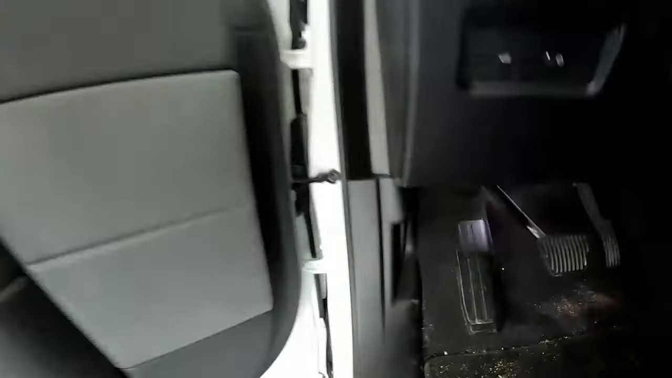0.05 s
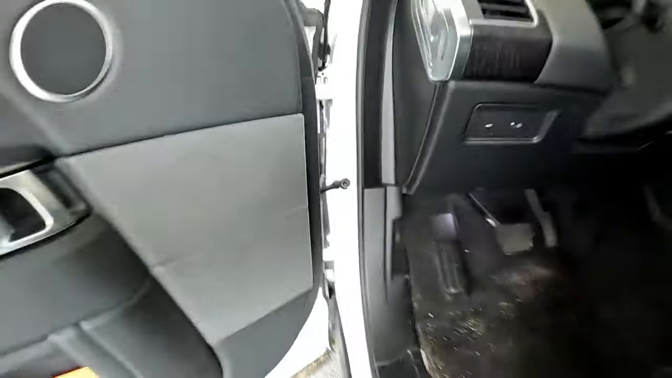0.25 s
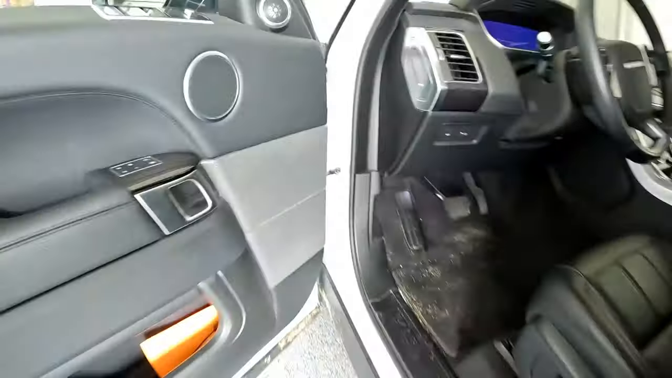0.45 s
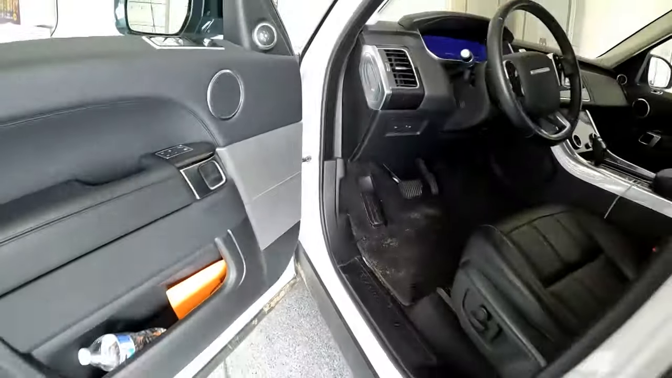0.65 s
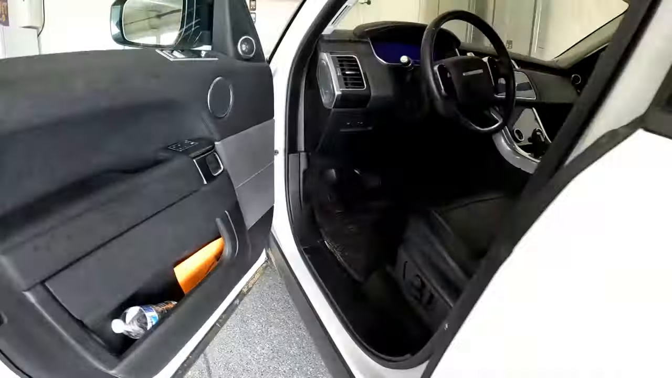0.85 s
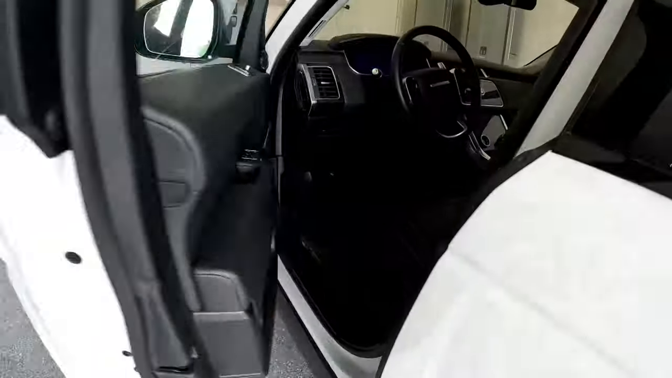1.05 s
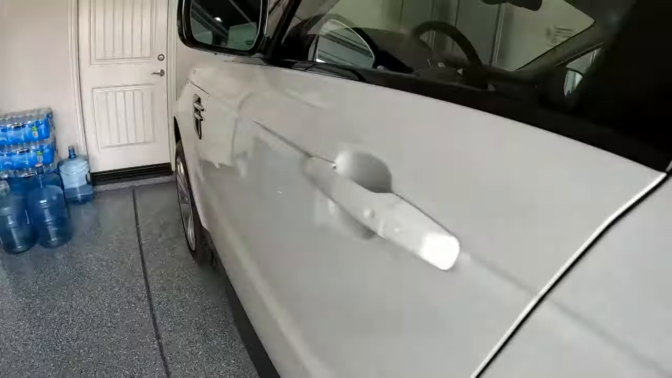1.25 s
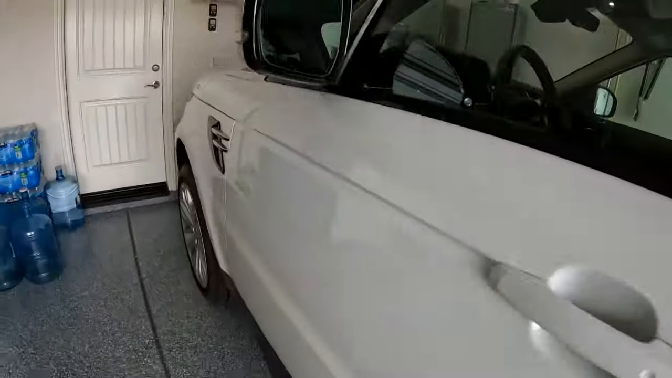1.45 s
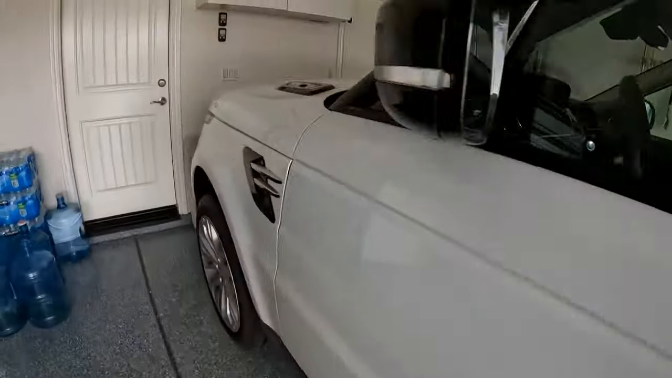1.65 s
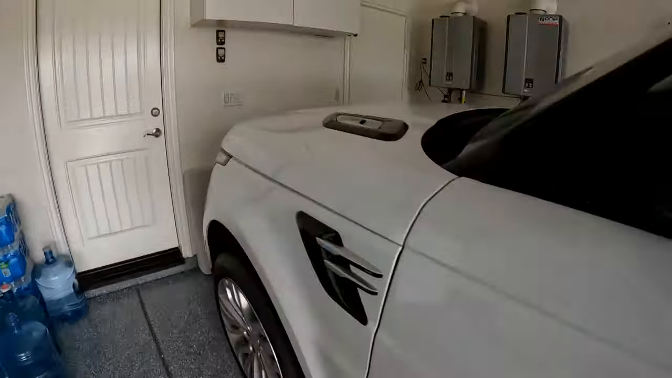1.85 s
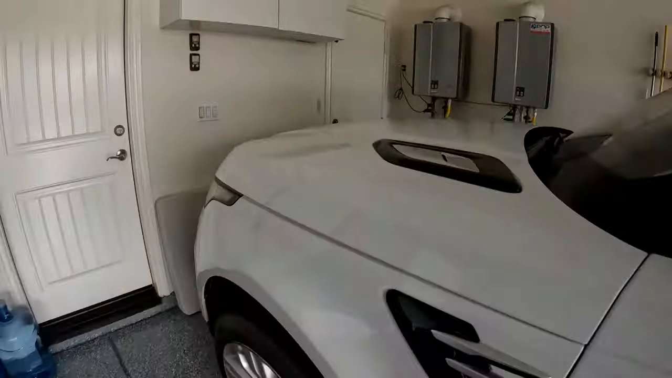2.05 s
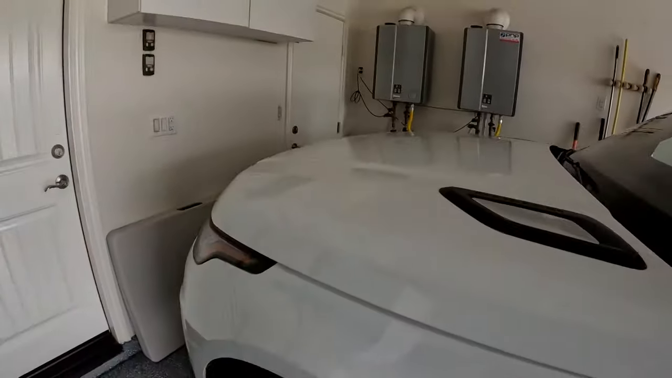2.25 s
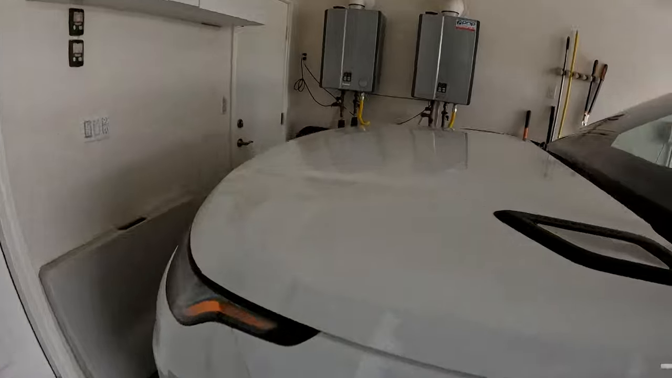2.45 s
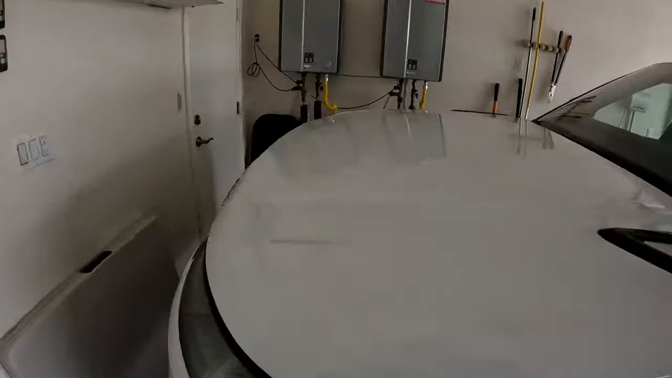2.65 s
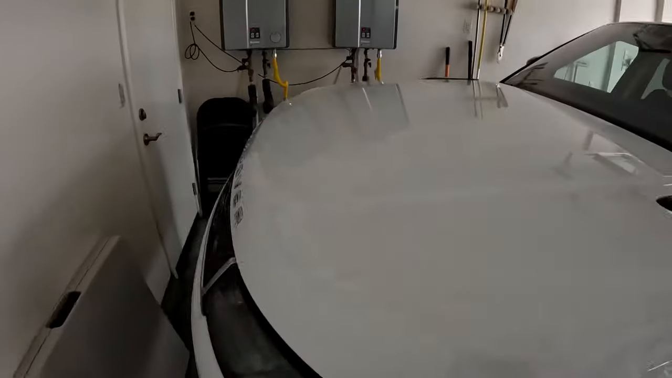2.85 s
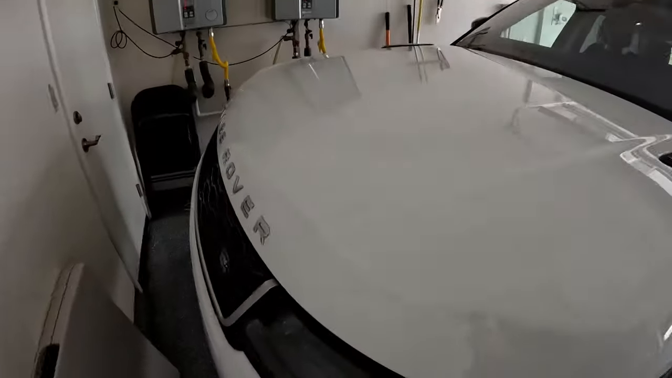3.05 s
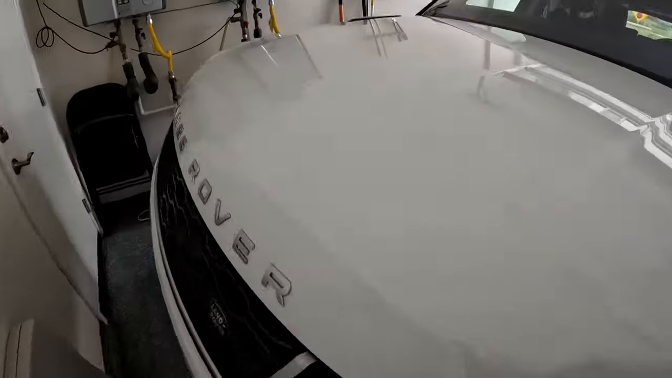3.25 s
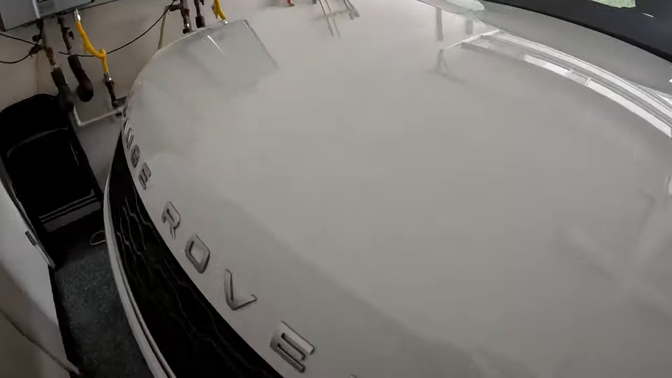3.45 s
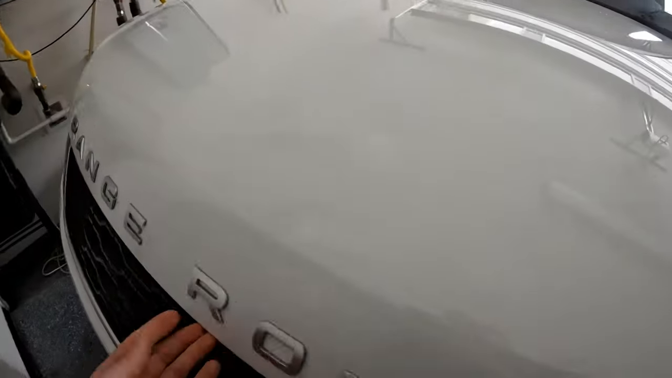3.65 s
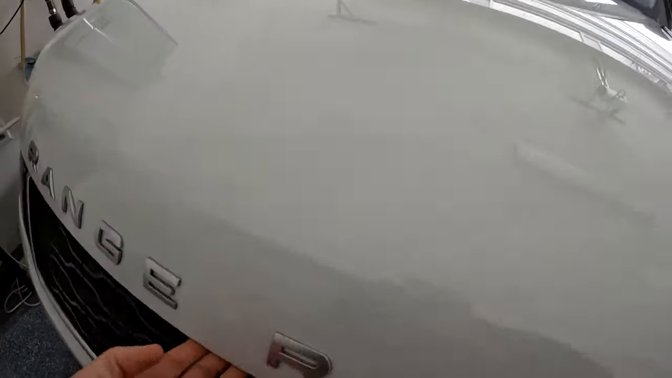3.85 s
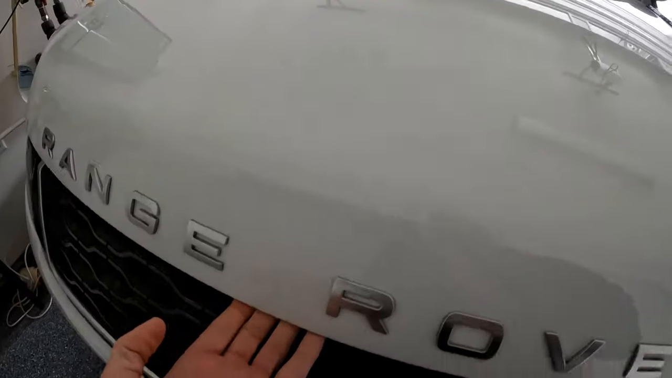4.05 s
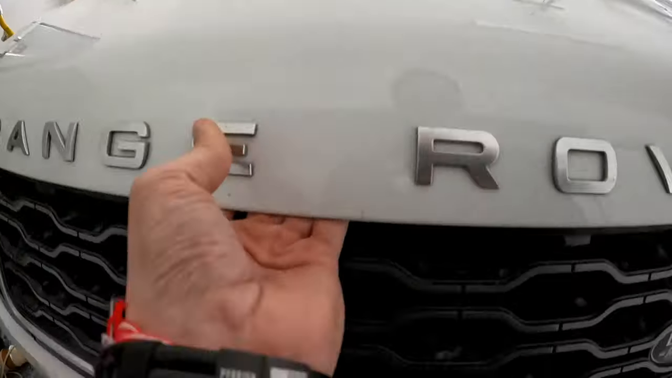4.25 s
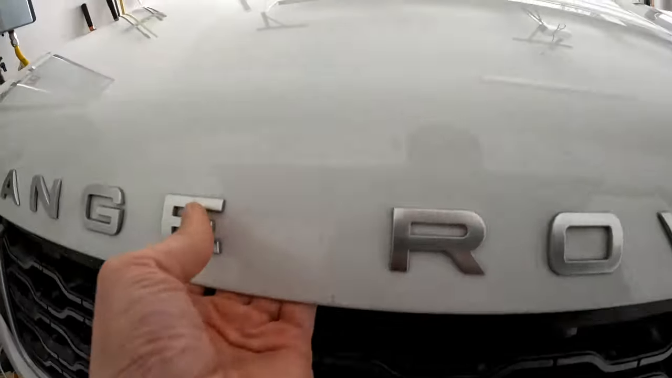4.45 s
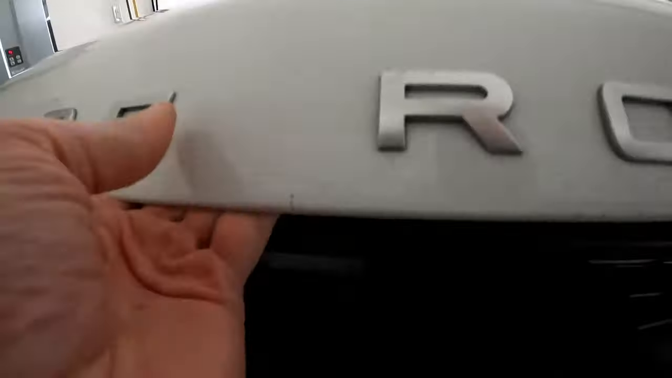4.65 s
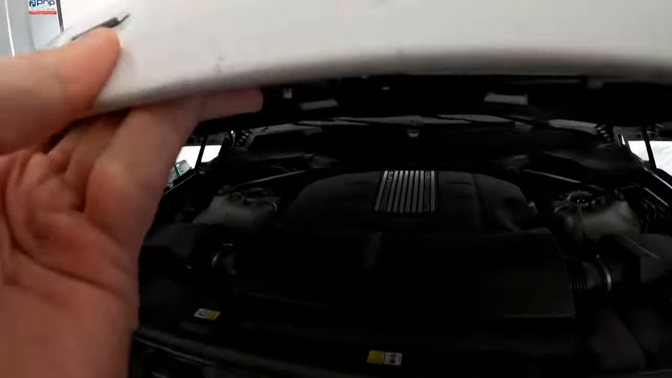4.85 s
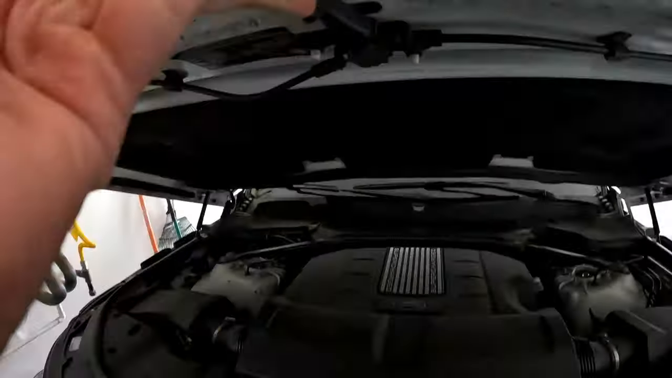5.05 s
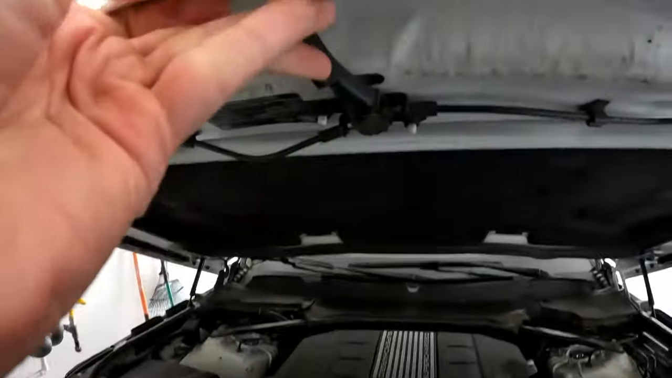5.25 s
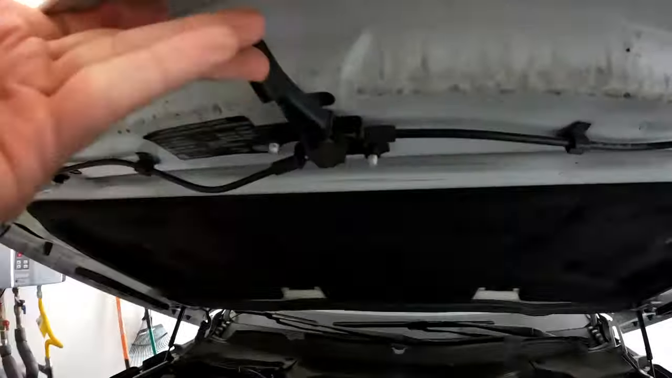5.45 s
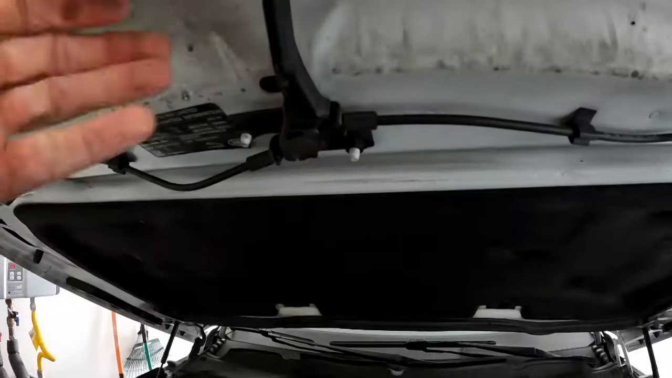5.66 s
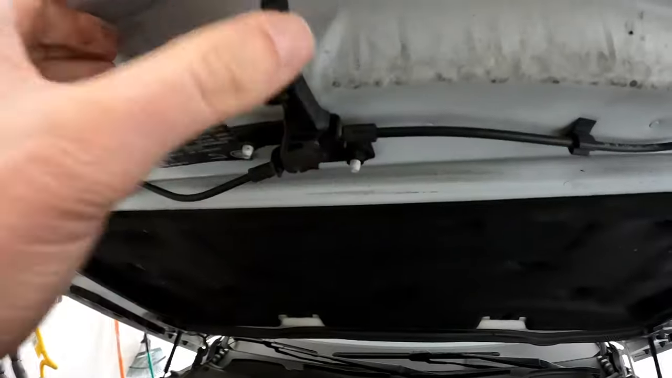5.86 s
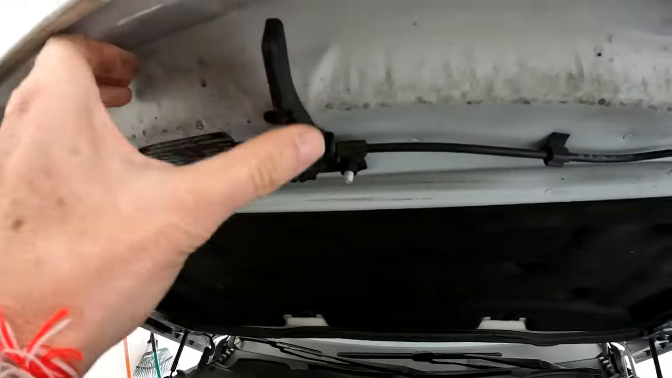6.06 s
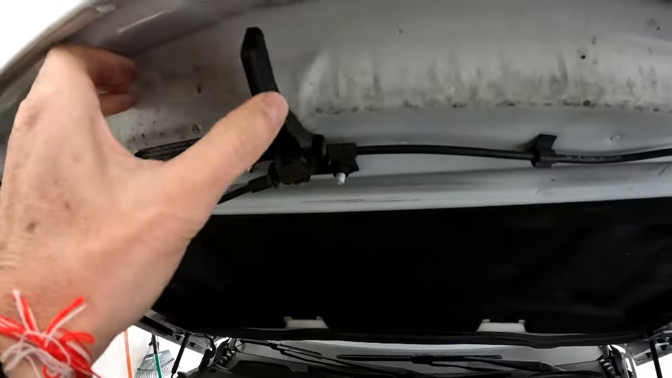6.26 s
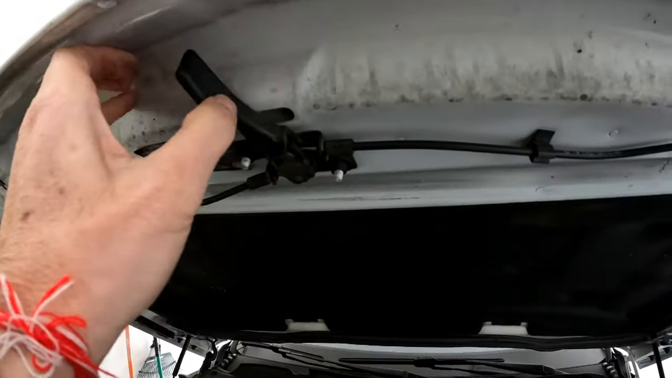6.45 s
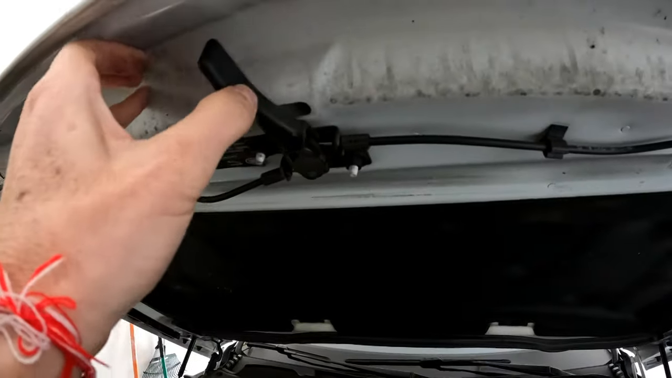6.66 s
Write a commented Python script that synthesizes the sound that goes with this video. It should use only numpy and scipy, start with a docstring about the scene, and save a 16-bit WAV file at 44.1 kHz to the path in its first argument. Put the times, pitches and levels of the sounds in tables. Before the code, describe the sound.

In a small garage with a short diffuse tail, a close hand-held stereo microphone picks up low handling rumble and faint clothes rustle throughout. From 0 to 1 s come soft bass bumps, tiny clicks and scuffs, with the rumble swelling near 0.5 s. At 1.3 s a car door slams: quick seal and latch contacts, a deep boom and a dying clattering wash. Around 2.1 s there are soft steps and a bright sleeve brush on the left. From 2.4 to 4.2 s trouser legs brush faintly about every 0.4 s; a sole creaks at 3.4. Fingers knock on hollow sheet metal from 3.7 to 4.4 s. At 4.5 s the metal catch snaps and rebounds brightly, followed by rubs, ticks and low bumps as the bonnet lifts. At 5.6 s its struts knock solidly on their stop. Faint fingertip slides and hand rubs, with a click near 6.55 s, close it.

```python
"""In a garage, two close microphone ports on a hand-held camera hear its holder step back from a car and slam the door.
A sleeve brushes near the left port, then trouser legs brush at each stride of the walk round to the bonnet; a sole creaks.
Fingers knock under the edge, the safety catch snaps free, the bonnet rises until its struts knock on their stop, and a hand rubs on.
Knocks are decaying modes plus noise cracks; cloth and hands are grainy noise strokes; handling rumble, shuffle and rustle
are fluttering noise that lasts throughout. The garage answers with a short diffuse tail."""
import sys
import numpy as np
from scipy import signal
from scipy.fft import rfft, irfft, next_fast_len
from scipy.io import wavfile
from scipy.ndimage import map_coordinates

SR = 44100
rng = np.random.default_rng(int(sys.argv[2]) if len(sys.argv) > 2 else 0)


def unload_audio(sound):
    """Save the sound as a 16-bit wav file, at the path given as the first command line argument."""
    columns = np.transpose(np.atleast_2d(sound))
    # keep every value between -1 and 1, then stretch to whole-number steps
    steps = np.round(np.clip(columns, -1, 1) * 32767)
    wavfile.write(sys.argv[1], SR, steps.astype(np.int16))


N = 295955

# Columns shared by the tables below:
#   hits: t/s, ring level/dB, clatter level/dB, brightness/(dB per octave)
#   modes: f/Hz, level relative to the ring/dB, T60/s
#   strokes: t/s, length/s, level/dB, brightness/(dB per octave)
#   spectra: f/Hz, relative density level/dB (per Hz)


def amp(db):
    """Decibels to gain."""
    return 10 ** (np.asarray(db) / 20)


def unit(x):
    """Scaled to rms 1."""
    return x / np.sqrt(np.mean(x ** 2) + 1e-20)


def along(points, hz):
    """Interpolates (f/Hz, value) points on a log frequency axis."""
    f, value = np.transpose(points)
    return np.interp(np.log(hz + 1), np.log(f + 1), value)


def wobble(rate):
    """A smooth random curve through rate knots a second."""
    knots = rng.standard_normal(int(N * rate / SR) + 4)
    return map_coordinates(knots, [np.arange(N) * rate / SR])


def filtered(x, response):
    """x times a response of frequency, padded against wrap-round."""
    n = x.shape[-1]
    size = next_fast_len(n + 8192)
    hz = np.fft.rfftfreq(size, 1 / SR)
    return irfft(rfft(x, size) * response(hz), size)[..., :n]


def coloured(x, spectrum, tilt_db, size=2048):
    """x through a causal minimum-phase filter of unit energy: the spectrum, tilted by about tilt_db per octave."""
    hz = np.fft.rfftfreq(size, 1 / SR)
    octaves = np.log2(hz / 1000 + 1 / 10)  # the tilt levels out in the bass
    gain = amp(along(spectrum, hz) + tilt_db * octaves)
    # folding the cepstrum forward in time makes the filter causal
    cepstrum = irfft(np.log(np.maximum(gain / gain.max(), 1e-5)))
    cepstrum[1:size // 2] *= 2
    cepstrum[size // 2 + 1:] = 0
    pulse = irfft(np.exp(rfft(cepstrum)))
    return signal.fftconvolve(x, pulse / np.linalg.norm(pulse))[:len(x)]


def add(track, s, sound):
    """Mixes a sound into the track at s seconds."""
    part = track[max(round(s * SR), 0):][:len(sound)]
    part += sound[:len(part)]


def struck(hits, modes, colour, crack_t60, crack_rise, attack, waver):
    """Each contact rings the modes anew and adds a short crack; loose joints make the modes waver. Times in s."""
    out, t = np.zeros(N), np.arange(SR // 2) / SR
    hz, level, t60 = np.transpose(modes)[:, :, None]
    rings = amp(level - 60 * t / t60) * (1 - np.exp(-t / attack))
    fade = amp(-60 * t / crack_t60) * (1 - np.exp(-t / crack_rise))
    slow = signal.butter(3, 150, fs=SR, output="sos")
    for s, ring_db, clatter_db, tilt_db in hits:
        # the phase wanders slowly, more for the higher modes
        jitter = signal.sosfilt(slow, rng.standard_normal(rings.shape))
        drift = waver * np.cumsum(jitter, axis=1) * np.sqrt(np.sqrt(hz) / SR)
        ring = np.sum(rings * np.sin(2 * np.pi * hz * t + drift), axis=0)
        crack = fade / fade.max() * rng.standard_normal(len(t))
        clatter = coloured(crack, colour, tilt_db)
        add(out, s, amp(ring_db) * ring + amp(clatter_db) * clatter)
    return out


def friction(strokes, colour, grain_db, grain_rate, skew):
    """Strokes that swell and fade, made of many tiny slips of uneven size."""
    out = np.zeros(N)
    slips = unit(rng.standard_normal(N) * amp(grain_db * wobble(grain_rate)))
    for s, length, db, tilt_db in strokes:
        t = np.arange(int(length * SR) + SR // 50) / SR
        swell = np.abs(np.sin(np.pi * np.minimum(t / length, 1) ** skew))  # skew below 1 peaks early
        stroke = swell * np.roll(slips, -int(s * SR))[:len(t)]
        add(out, s, amp(db) * coloured(stroke, colour, tilt_db))
    return out


# diffuse sound at the two ports: f/Hz, side level re mid/dB
DIFFUSE_WIDTH = [(60, -15), (180, -13), (400, -6.5), (1200, -8), (2500, -6.5), (8000, -7.5), (14000, 5.5)]


def diffuse(pair):
    """Two unrelated signals as close microphone ports hear them: most alike in the bass, apart in the high treble."""
    side = filtered(pair[1], lambda hz: amp(along(DIFFUSE_WIDTH, hz)))
    return np.array([pair[0] + side, pair[0] - side])


def shaded(pair, pan_db):
    """The camera body shades one port in the treble; pan_db is the left-minus-right limit at high frequency."""
    sides = np.array([[1], [-1]])
    return filtered(pair, lambda hz: amp(sides * pan_db / 2 * hz / (hz + 3000)))


def rush(spectrum, flutter_db, rate):
    """Diffuse noise of rms 1 whose level flutters."""
    noise = filtered(rng.standard_normal((2, N)), lambda hz: amp(along(spectrum, hz)))
    return unit(diffuse(noise) * amp(flutter_db * wobble(rate)))


# the door meets seal, first latch stage and striker: hits
DOOR_CONTACTS = [(1.295, -39, -46.5, -3.5), (1.3065, -25.5, -17.5, -2), (1.3115, -24.5, -16, -5),
                 (1.3175, -16.5, -14.5, 3), (1.3255, -24, -21, -3.5), (1.341, -22, -31, -0.5),
                 (1.374, -36, -38, -4)]
# door skin and cabin air: modes
DOOR_RESONANCES = [(36.2, 5.5, 0.41), (45.9, 5, 0.42), (84, -5.5, 0.08), (117, 3.5, .2), (169.8, -2, 0.17),
                   (227, -8, 0.15), (354.8, -7, 0.17), (480.6, -11, .12), (1020, -15, 0.044)]
# crack and wash of the door: spectrum
DOOR_SPECTRUM = [(120, -13), (280, -3), (500, -2.5), (850, -9), (1070, 0.5), (1300, -5.5), (2000, -6.5),
                 (2280, -12.5), (2700, -8), (3100, -12), (4000, -14), (5200, -17.5), (7400, -25),
                 (11000, -44), (15500, -63)]


def door_slam():
    """Seal, latch and striker contacts ring the door skin and the cabin air."""
    return struck(DOOR_CONTACTS, DOOR_RESONANCES, DOOR_SPECTRUM,
                  crack_t60=0.027, crack_rise=0.002, attack=0.00027, waver=2.5)


WASH_S, WASH_RISE_S, WASH_T60_S = 1.312, 0.0066, 0.22
WASH_DB, WASH_TILT_DB = -21, -0.5  # decay line's level at the start; brightness in dB per octave


def door_wash():
    """Trim rattles and echoes merge into a smooth, dying crash after the slam."""
    out, t = np.zeros((2, N)), np.arange(SR // 2) / SR
    fade = amp(WASH_DB - 60 * t / WASH_T60_S) * (1 - np.exp(-t / WASH_RISE_S))
    for track in out:
        crash = fade * rng.standard_normal(len(t))
        add(track, WASH_S, coloured(crash, DOOR_SPECTRUM, WASH_TILT_DB))
    return diffuse(out)


# the struts reach the end of their travel: hits, modes, spectrum
STOP_CONTACTS = [(5.6115, -49, -44, -7), (5.6205, -48, -33.5, 0.5), (5.624, -28, -14, -3.5),
                 (5.6315, -21.5, -16, -1.5), (5.634, -10, -25, 0)]
STOP_RESONANCES = [(122.7, -4, 0.13), (170, -2, 0.11), (233, 4, 0.068), (262, -10, 0.19), (346, -15, 0.15),
                   (532, -12.5, 0.1), (838, -17, 0.072), (980, -15, 0.08)]
STOP_SPECTRUM = [(180, -14.5), (300, -17), (450, -19.5), (1000, 1), (1700, -12.5), (1950, -17.5),
                 (2250, -15), (3900, -20.5), (4750, -16.5), (6500, -20.5), (7800, -19), (13000, -44),
                 (15500, -50)]


def strut_stop():
    """The raised bonnet rings as its struts knock against their stop."""
    return struck(STOP_CONTACTS, STOP_RESONANCES, STOP_SPECTRUM,
                  crack_t60=0.028, crack_rise=0.00086, attack=0.002, waver=2.5)


# the safety catch lets go and rebounds: hits, modes, spectrum
CATCH_CONTACTS = [(4.4872, -33, -21.5, 5.5), (4.4915, -29, -23, 2), (4.5065, -27, -16, 5),
                  (4.511, -29, -23, 3), (4.532, -44, -38.5, 1)]
CATCH_RESONANCES = [(114, 7, 0.14), (266.5, -3.5, 0.15), (358, -15, 0.12), (504, -5.5, 0.084),
                    (1033, 1, 0.1), (1390, 0.5, 0.082), (2155, 1, 0.042), (4370, -8.5, 0.071)]
CATCH_SPECTRUM = [(120, -7), (260, 20), (640, 4.5), (1100, 7.5), (1500, 4.5), (2170, -4.5), (3000, -15),
                  (3700, -10.5), (4260, -12.5), (4900, -25.5), (6300, -25.5), (7300, -40), (12900, -49.5),
                  (15500, -58.5)]


def safety_catch():
    """The catch snaps free and rebounds in a bright burst of metal contacts."""
    return struck(CATCH_CONTACTS, CATCH_RESONANCES, CATCH_SPECTRUM,
                  crack_t60=0.022, crack_rise=0.002, attack=0.00062, waver=1.95)


REBOUND_S, REBOUND_DB = 0.027, -7.5  # delay and level change of the rebound


def rattled(hits):
    """The loose bonnet rattles once more, weaker, after each knock."""
    rebounds = [(s + REBOUND_S, ring_db + REBOUND_DB, clatter_db + REBOUND_DB, tilt_db)
                for s, ring_db, clatter_db, tilt_db in hits]
    return list(hits) + rebounds


# fingers and hand on the bonnet: hits, modes, spectrum
BONNET_KNOCKS = [(3.721, -27, -39, 5.5), (3.936, -41, -34, 0), (4.092, -34, -28.5, 2.5),
                 (4.098, -24.5, -33, -6.5), (4.11, -29, -26.5, -3), (4.32, -31.5, -52.5, 3),
                 (4.363, -26.5, -26.5, -7.5), (4.545, -30.5, -31.5, 1), (4.826, -35, -51, 10.5),
                 (4.998, -34, -50.5, 6.5), (5.084, -55, -42, 4)]
BONNET_RESONANCES = [(58.4, -5, 0.212), (131.4, -3, 0.2), (216.2, -11, 0.32), (269.5, 0.5, 0.083),
                     (303, -16, 0.29), (390, -6.5, 0.077), (518, -13.5, 0.053), (1054, -21.5, 0.1),
                     (1143, -16, 0.06), (1378, -19.5, 0.057)]
BONNET_SPECTRUM = [(120, -5.5), (200, -29), (262, -4), (683, -9), (1150, -12.5), (1360, -17), (1750, -21.5),
                   (2330, -25.5), (7690, -47), (15000, -73)]


def bonnet_knocks():
    """Fingers and hand knock on the loose sheet, which rings and rebounds."""
    return struck(rattled(BONNET_KNOCKS), BONNET_RESONANCES, BONNET_SPECTRUM,
                  crack_t60=0.035, crack_rise=0.0015, attack=0.0012, waver=2.57)


# strokes of the hand and of the sliding struts: strokes, spectrum
RUB_STROKES = [(4.62, 0.17, -40.5, -4), (4.8, 0.078, -50.5, 1), (5.575, 0.062, -45, -1),
               (6.27, 0.044, -55.5, -0.5), (6.335, 0.14, -45, 2), (6.535, 0.078, -40.5, 0.5),
               (6.65, 0.074, -46, 2)]
RUB_SPECTRUM = [(120, -8), (200, 1), (352, -2), (479, -9.5), (798, -2), (1170, -3.5), (1430, -10),
                (3610, -25.5), (5300, -20), (5910, -23.5), (10200, -34), (15500, -54.5)]


def rubs():
    """Hand and sliding struts rub in fine, even slips."""
    return friction(RUB_STROKES, RUB_SPECTRUM, grain_db=1.0, grain_rate=490, skew=1.05)


# fingertips on paint and plastic: strokes, spectrum
SLIDE_STROKES = [(4.58, 0.17, -48.5, -1.5), (5.247, 0.049, -49, -1), (5.508, 0.047, -53.5, -1),
                 (5.832, 0.049, -58.5, 7), (5.968, 0.072, -55, 1), (6.118, 0.049, -60.5, -4)]
SLIDE_SPECTRUM = [(250, -2.5), (700, 0), (1300, 2), (2100, -8), (2900, -11.5), (3800, -28), (8000, -32),
                  (15500, -49.5)]


def fingertip_slides():
    """Fingertips slip softly over paint and plastic."""
    return friction(SLIDE_STROKES, SLIDE_SPECTRUM, grain_db=2.5, grain_rate=300, skew=0.58)


# the clearest clicks of grit, trim and linkage: t/s, level before doubling/dB, brightness/(dB per octave)
CLEAR_TICKS = [(0.125, -39, 4), (0.13, -44.5, 6), (.432, -50, 5.5), (1.842, -48, -9), (3.672, -35.5, -3),
               (4.673, -43, -8), (4.85, -45.5, -3), (4.882, -43, -6), (4.99, -48, -1), (5.02, -37, -8.5),
               (5.32, -52, -7), (5.512, -52, 9), (5.756, -51.5, 0.5), (6.548, -44, 8)]
# clicks: spectrum
TICK_SPECTRUM = [(300, -30.5), (1200, 12.5), (2800, 7), (6000, 10), (9000, -2.5), (15500, -31.5)]
# the camera is drawn back, then the bonnet is lifted: from t/s, to t/s
FAINT_TICK_SPELLS = [(0.381, .85), (4.65, 5.35)]
FAINT_TICK_COUNT = 4  # in each spell
FAINT_TICK_DB, FAINT_TICK_SPREAD_DB = -59, 4  # mean level before doubling, and standard deviation


def ticks(t60, rise):
    """Tiny hard contacts that hardly ring: the clear ones, and faint ones at random. Times in s."""
    out, t = np.zeros(N), np.arange(SR // 20) / SR
    contacts = list(CLEAR_TICKS)
    for start, end in FAINT_TICK_SPELLS:
        for _ in range(FAINT_TICK_COUNT):
            s = start + (end - start) * rng.random()
            db = FAINT_TICK_DB + FAINT_TICK_SPREAD_DB * rng.standard_normal()
            contacts.append((s, db, 0))
    for s, db, tilt_db in contacts:
        fade = 2 * amp(db - 60 * t / t60) * (1 - np.exp(-t / rise))
        snap = fade * rng.standard_normal(len(t))
        add(out, s, coloured(snap, TICK_SPECTRUM, tilt_db))
    return out


# footfalls and bumps of the carried camera: hits (thump as ring, slap as clatter), modes
STEP_CONTACTS = [(.045, -32, -56, -7), (.078, -30.5, -55, 6), (.354, -32.5, -52, -4), (.386, -28, -48, 0),
                 (.585, -32, -52, -4.5), (.978, -33, -37.5, -2), (2.066, -30, -58.5, 5.5),
                 (2.108, -30.5, -43, -3), (2.179, -37.5, -41.5, -3), (4.937, -24, -79, 3),
                 (5.006, -30, -45.5, 3), (5.129, -35.5, -68, 10)]
STEP_RESONANCES = [(44.3, 1.5, 0.17), (67, -1, 0.13), (102, -5.5, 0.12), (148, -12.5, 0.13)]
# slaps of steps and heels, snaps of the creak: spectrum
STEP_SPECTRUM = [(80, -16.5), (220, 5), (560, -0.5), (900, -9), (2400, -14), (6000, -29.5), (15000, -56)]


def steps():
    """Footfalls and camera bumps thump in the bass with a faint slap."""
    return struck(STEP_CONTACTS, STEP_RESONANCES, STEP_SPECTRUM,
                  crack_t60=0.02, crack_rise=0.0023, attack=0.0041, waver=1.0)


# heels on the floor: hits (slap as clatter), modes
HEEL_CONTACTS = [(.302, -41, -41, -0.5), (2.502, -53, -41.5, -2.5), (2.9005, -36, -41, -3.5)]
HEEL_RESONANCES = [(152, -7.5, 0.15), (305, -10, 0.052), (476, 4.5, 0.042), (609, 3, 0.021),
                   (593, -4, 0.037)]


def heels():
    """Heels knock hollowly on the floor, with short mid-range modes."""
    return struck(HEEL_CONTACTS, HEEL_RESONANCES, STEP_SPECTRUM,
                  crack_t60=0.027, crack_rise=0.004, attack=0.0039, waver=2.4)


# a sole creaks in three slips: hits (snap as clatter), modes
CREAK_SLIPS = [(3.419, -43, -39.5, -11), (3.4303, -40, -43, -1), (3.4441, -40.5, -46.5, 3)]
CREAK_RESONANCES = [(98, 11, 0.051), (248, -6, 0.033), (750, 4, 0.0077), (1120, -6.5, 0.016),
                    (2240, 5.5, 0.0073)]


def sole_creak():
    """A sole sticks and slips three times, each slip a very short ring."""
    return struck(CREAK_SLIPS, CREAK_RESONANCES, STEP_SPECTRUM,
                  crack_t60=0.01, crack_rise=0.00029, attack=0.0001, waver=1.5)


# soles and clothes scuff: strokes
SCUFF_STROKES = [(0, 0.036, -44, 3), (0.287, 0.028, -46, 6.5), (.38, 0.19, -66.5, 1.5),
                 (.645, .022, -38, 2.5), (.654, .02, -41, 1.5), (.68, 0.092, -63, 2),
                 (1.77, 0.14, -60.5, 1.5), (3.36, 0.11, -62, 2.5), (3.512, 0.021, -59, 1),
                 (3.63, 0.076, -50.5, 1.5), (3.738, 0.077, -52.5, 2.5), (3.916, 0.039, -44.5, 2.1),
                 (4.06, 0.14, -52.5, 0)]
# scuffs and trouser legs: spectrum
SCUFF_SPECTRUM = [(100, -10), (290, 1), (500, -1), (1030, -4), (1670, -4), (2260, -7.5), (2570, -7),
                  (3850, -11), (6270, -12.5), (9650, -28), (15500, -53)]


def scuffs():
    """Soles and clothes scuff in short strokes of uneven grain."""
    return friction(SCUFF_STROKES, SCUFF_SPECTRUM, grain_db=3.5, grain_rate=370, skew=0.6)


WALK_START_S, STRIDE_S, STRIDE_COUNT = 2.4245, 0.39, 5
BRUSH_S, BRUSH_DB = 0.23, -59  # length and first level
BRUSH_GAIN_DB, BRUSH_TILT_DB = -0.66, 2.1  # level change a stride; brightness in dB per octave


def trouser_legs():
    """Cloth brushes cloth once for each stride of an even walk to the bonnet."""
    strides = [(WALK_START_S + k * STRIDE_S, BRUSH_S, BRUSH_DB + k * BRUSH_GAIN_DB, BRUSH_TILT_DB)
               for k in range(STRIDE_COUNT)]
    return friction(strides, SCUFF_SPECTRUM, grain_db=3.0, grain_rate=200, skew=0.75)


# a sleeve close by the left port: strokes, spectrum
SLEEVE_STROKES = [(2.102, .022, -49, -3), (2.165, 0.053, -52, -1.5)]
SLEEVE_SPECTRUM = [(1000, -5), (5500, -3), (7500, 5.5), (9500, -12.5), (12200, -3), (15500, -17.5)]


def sleeve():
    """A sleeve brushes in two short strokes of bright, grainy noise."""
    return friction(SLEEVE_STROKES, SLEEVE_SPECTRUM, grain_db=3.0, grain_rate=480, skew=0.82)


# level of the background noise, which rises briefly near 1.36 s and 4.66 s: t/s, level/dB
BACKGROUND_LEVEL = [(0.0, -60), (0.11, -67.5), (0.93, -71), (1.36, -61), (1.47, -72), (4.01, -62),
                    (4.46, -69.5), (4.66, -62.5), (5.26, -67.5), (5.64, -67.5), (6.1, -76), (6.7, -72)]
USUAL_BACKGROUND_DB = -67


def background_swell():
    """The level of the background noise through time, in dB above the usual."""
    t = np.arange(N) / SR
    return np.interp(t, *np.transpose(BACKGROUND_LEVEL)) - USUAL_BACKGROUND_DB


# handling rumble: spectrum
RUMBLE_SPECTRUM = [(11, -24), (18, 9), (38, 0), (59, -5), (97, -11.5), (134, -16.5), (226, -25),
                   (321, -45.5), (400, -43), (520, -59.5), (880, -120)]
RUMBLE_DB, RUMBLE_GROWS = -43.5, 0.14  # level at no swell; dB per dB of background swell
SWING_S, SWING_WIDTH_S, SWING_DB = 0.46, 0.17, 9.5


def handling_rumble(swell_db):
    """The held camera rumbles, swelling as it swings out of the cabin."""
    t = np.arange(N) / SR
    swing_db = SWING_DB * np.exp(-((t - SWING_S) / SWING_WIDTH_S) ** 2)
    level_db = RUMBLE_DB + RUMBLE_GROWS * swell_db + swing_db
    return amp(level_db) * rush(RUMBLE_SPECTRUM, flutter_db=1.44, rate=66)


# shuffling feet: spectrum
SHUFFLE_SPECTRUM = [(110, -42), (180, -21), (205, -16.5), (237, 3), (384, -0.5), (696, -16), (1170, -11.5),
                    (1600, -21), (2080, -49), (3520, -120)]
SHUFFLE_DB, SHUFFLE_GROWS = -65, 1.2  # level at no swell; dB per dB of background swell


def foot_shuffle(swell_db):
    """Shuffling feet make fluttering mid-range noise that follows the background swell."""
    return amp(SHUFFLE_DB + SHUFFLE_GROWS * swell_db) * rush(SHUFFLE_SPECTRUM, flutter_db=3.0, rate=27)


# rustling clothes: spectrum
RUSTLE_SPECTRUM = [(590, -28.5), (1000, -8.5), (1080, -4.5), (1220, 4), (1680, -3), (1860, -2.5),
                   (4050, -8), (6870, -7.5), (8250, -14.5), (12200, -21.5), (15500, -39.5)]
RUSTLE_DB, RUSTLE_GROWS = -66.5, 1  # level at no swell before shading; dB per dB of background swell


def clothes_rustle(swell_db):
    """Clothes rustle in bright fluttering noise, stronger at the left port."""
    rustle = amp(RUSTLE_DB + RUSTLE_GROWS * swell_db) * rush(RUSTLE_SPECTRUM, flutter_db=1.26, rate=39)
    return shaded(rustle, pan_db=4.0)


def background():
    """Rumble, shuffle and rustle rise and fall together, the rumble least."""
    swell_db = background_swell()
    return handling_rumble(swell_db) + foot_shuffle(swell_db) + clothes_rustle(swell_db)


# how long the garage rings: f/Hz, T60/s
GARAGE_DECAY = [(60, 0.42), (250, 0.21), (1200, 0.22), (5000, 0.18), (14000, 0.2)]


def placed(x, room_db, pan_db):
    """The direct sound and the garage's short diffuse answer, as the two ports hear them."""
    hz, t, bands = signal.stft(rng.standard_normal((2, SR // 2)), SR, nperseg=256)
    decay = amp(-60 * t / along(GARAGE_DECAY, hz)[:, None])
    tail = signal.istft(bands * decay * (1 - np.exp(-t / 0.003)), SR, nperseg=256)[1]
    echo = signal.fftconvolve(x[None], tail / np.linalg.norm(tail[0]), axes=1)[:, :N]
    # deep bass stays near its source and hardly fills the room
    echo = filtered(echo, lambda f: f / np.hypot(f, 220))
    return shaded(x + amp(room_db) * diffuse(echo), pan_db)


def scene():
    """Door, strut stop, catch, bonnet and the person's own noises; positive pan favours the left port."""
    hands = rubs() + fingertip_slides() + sole_creak() + ticks(t60=0.013, rise=0.00037)
    feet = steps() + heels() + scuffs()
    return (placed(door_slam(), room_db=-12, pan_db=1.8) + door_wash()
            + placed(strut_stop(), room_db=-17.5, pan_db=0.5)
            + placed(safety_catch(), room_db=-14.5, pan_db=-0.5)
            + placed(bonnet_knocks(), room_db=-8.5, pan_db=1.5)
            + placed(hands, room_db=-11.5, pan_db=1.0)
            + placed(feet, room_db=-5, pan_db=6.5)
            + placed(trouser_legs(), room_db=-6.5, pan_db=6)
            + placed(sleeve(), room_db=-4.0, pan_db=7.5)
            + background())


# level between the ports: f/Hz, left minus right level/dB
PORT_LEVELS = [(300, -0.7), (1200, 0.5), (5000, -1), (8000, 1), (12000, 2.5)]
# phase between the ports: f/Hz, lag of the left port/rad
PORT_PHASES = [(100, 0), (400, 0.26), (1100, 0.52), (3000, 0.79), (7000, 0.57), (12000, 0.34)]
TOP_HZ = 15700  # upper band limit


def record(dry):
    """The ports differ a little in phase and level; the camera rounds off peaks and cuts above its band limit."""
    half = np.array([[1], [-1]]) / 2

    def ports(hz):
        """Each port takes half of the level and phase difference."""
        return amp(half * along(PORT_LEVELS, hz)) * np.exp(-1j * half * along(PORT_PHASES, hz))

    heard = filtered(dry, ports)
    rounded = heard / (1 + np.abs(heard / 0.8) ** 6) ** (1 / 6)  # nears 0.8 at most
    return filtered(rounded, lambda hz: hz < TOP_HZ)


dry = scene()
out = record(dry)
unload_audio(out)
```